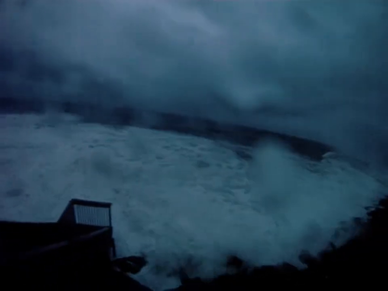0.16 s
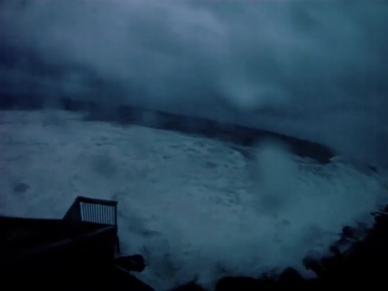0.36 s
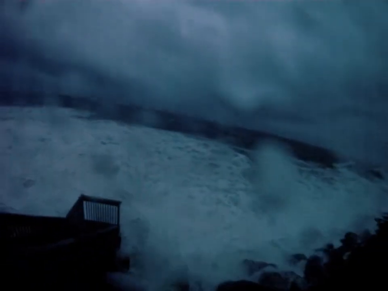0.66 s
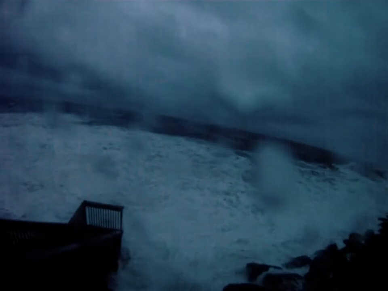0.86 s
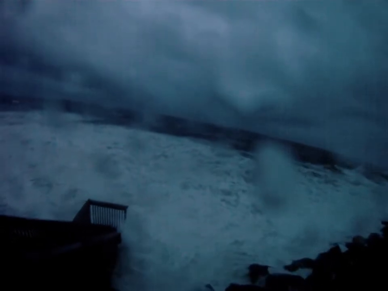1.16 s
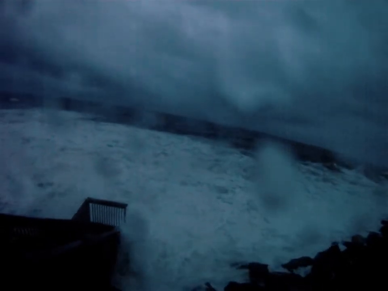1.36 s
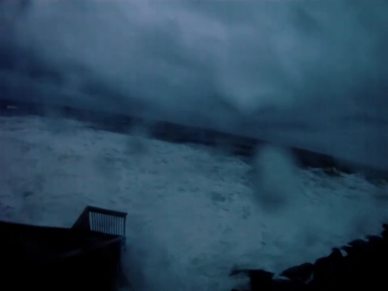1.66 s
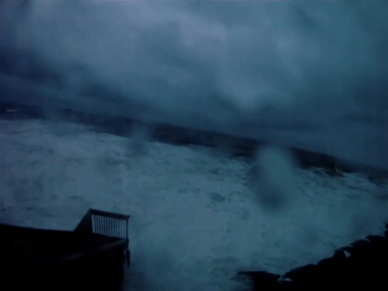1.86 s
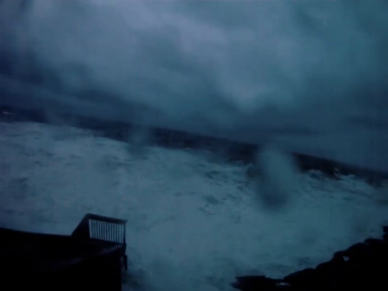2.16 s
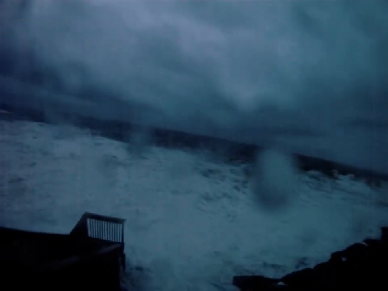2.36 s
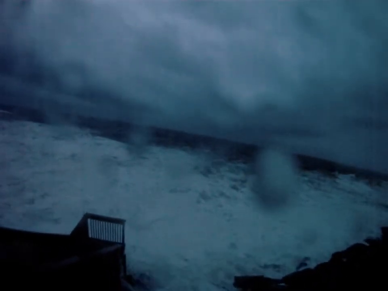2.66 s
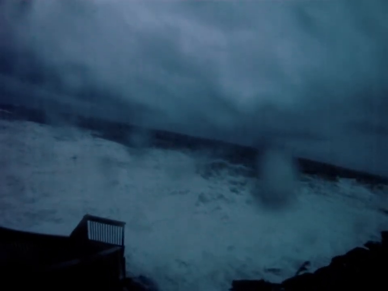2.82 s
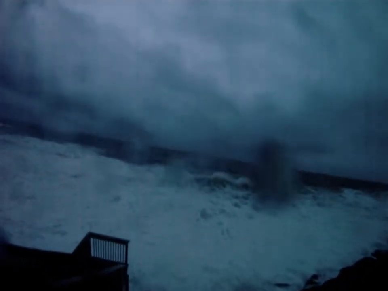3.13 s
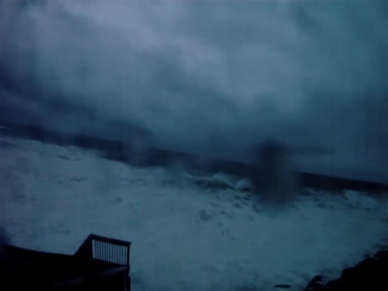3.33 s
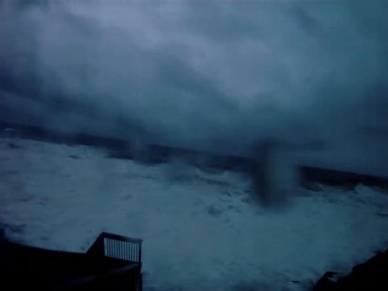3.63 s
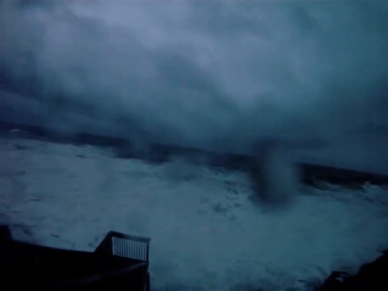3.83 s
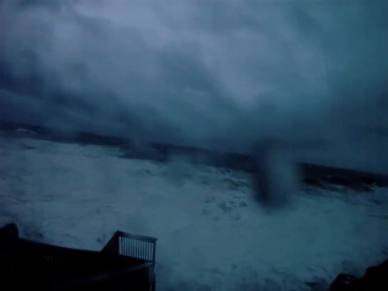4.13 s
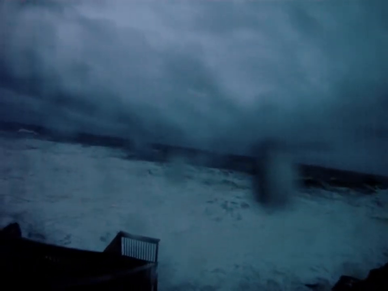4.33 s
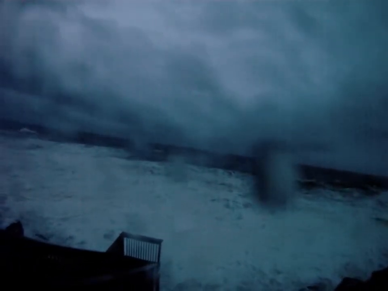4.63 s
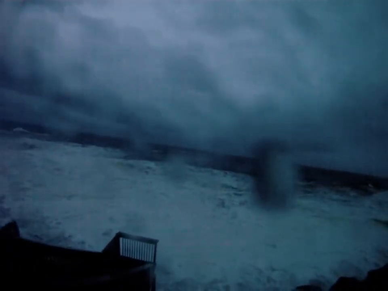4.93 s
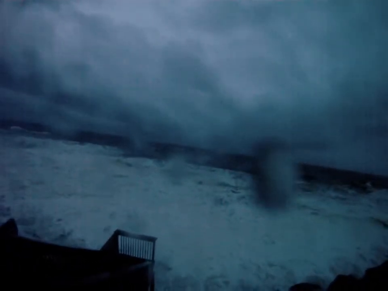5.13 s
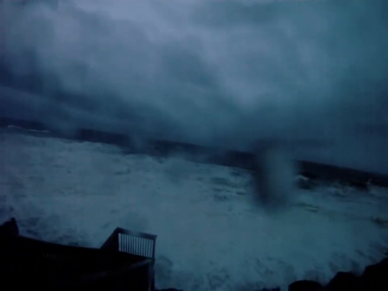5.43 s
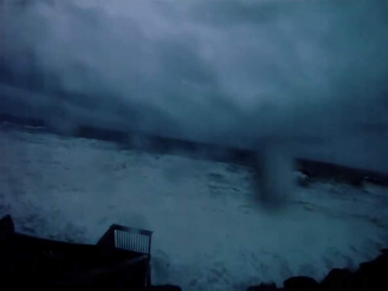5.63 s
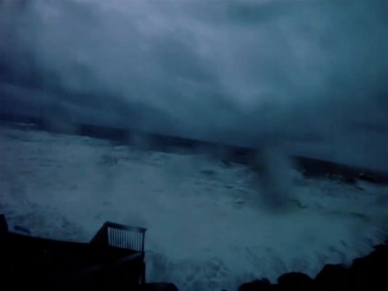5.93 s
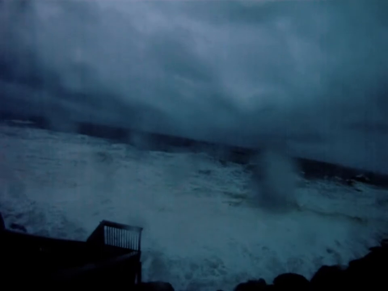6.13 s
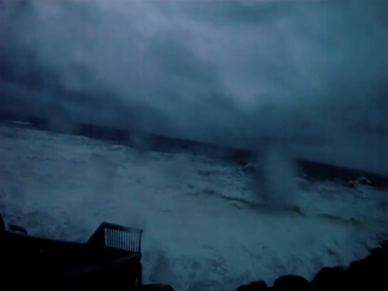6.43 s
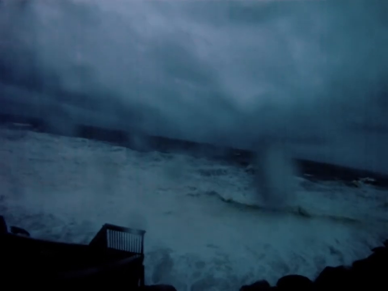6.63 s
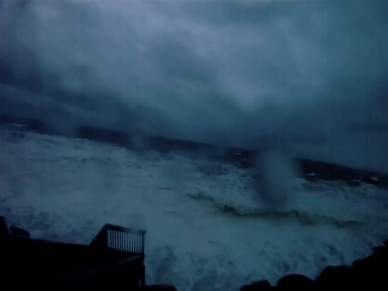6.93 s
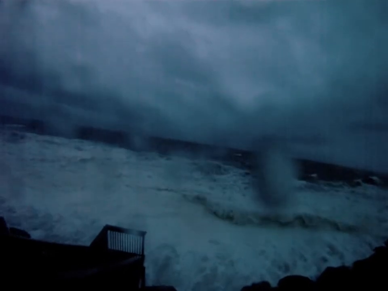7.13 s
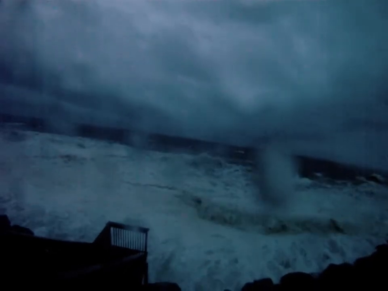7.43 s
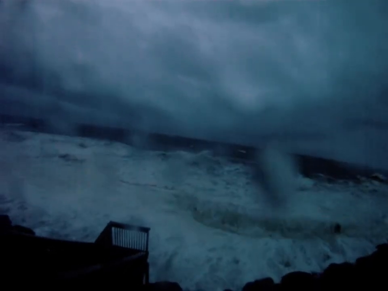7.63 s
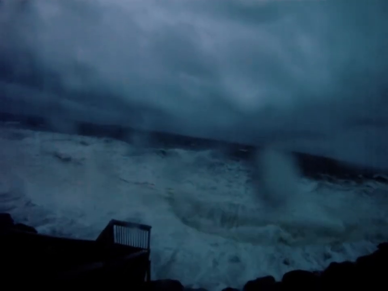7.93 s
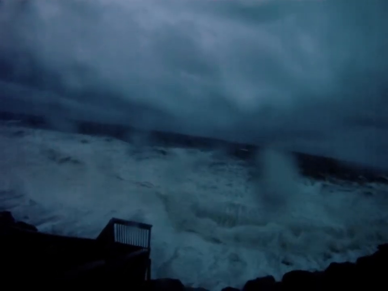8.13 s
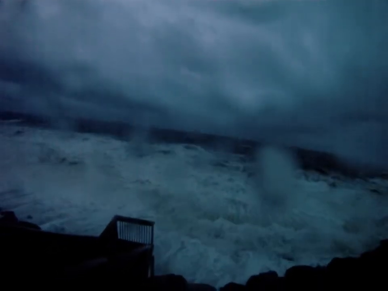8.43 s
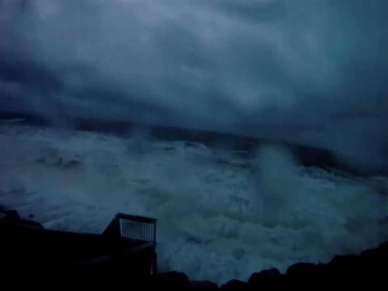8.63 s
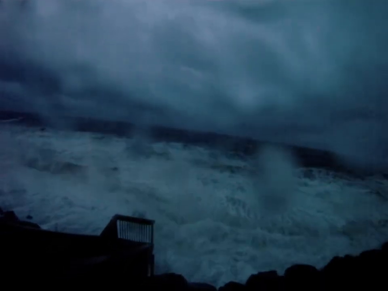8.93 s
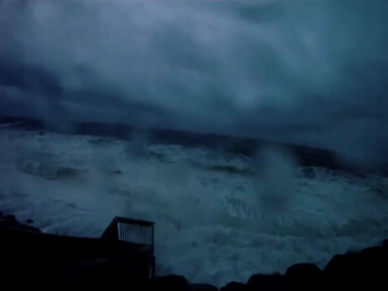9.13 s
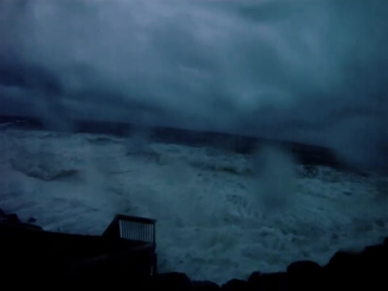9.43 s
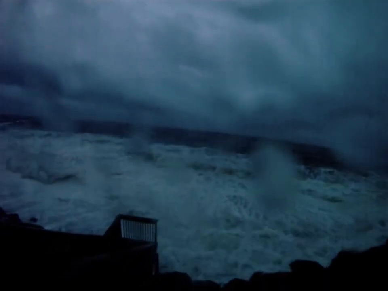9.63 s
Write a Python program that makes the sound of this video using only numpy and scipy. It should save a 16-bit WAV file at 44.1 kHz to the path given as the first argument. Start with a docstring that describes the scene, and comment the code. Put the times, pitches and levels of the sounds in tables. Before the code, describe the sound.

Heavy surf makes a constant rough wash with no cleanly separate wave crashes, over a deep fluttering wind rumble. Very close water drops click, snap and thud on the microphone housing at uneven intervals, sometimes clustered. Hiss is coloured by the case, briefly brighter around six seconds. Late gusts and surf grow fuller. Centred mono, boxy, with muted extreme treble and no echo.

```python
"""A seawall in storm surf, heard from inside a waterproof case.
Wind rumble and surf roar are shaped noise; foam hiss and fine droplets ring through the case's resonances.
Large and small drops tick on the shell: each is a tuned blow, a treble snap, a dull thud and a spatter.
For about a second the resonances sit higher, as if wet. The hardest peaks overload the microphone.
Shared swells, gusts and eddies move the wind, surf and spray levels together."""
import sys
import numpy as np
from scipy import signal
from scipy.fft import rfft, irfft
from scipy.io import wavfile
from scipy.ndimage import map_coordinates

SR = 44100
rng = np.random.default_rng(int(sys.argv[2]) if len(sys.argv) > 2 else 0)


def unload_audio(sound):
    """Save the sound as a 16-bit wav file, at the path given as the first command line argument."""
    columns = np.transpose(np.atleast_2d(sound))
    # keep every value between -1 and 1, then stretch to whole-number steps
    steps = np.round(np.clip(columns, -1, 1) * 32767)
    wavfile.write(sys.argv[1], SR, steps.astype(np.int16))


N = 430857
TIME = np.arange(N) / SR  # [s]

# slow swell of the storm, before the layer trims: (time [s], wind level [dB], surf and spray level [dB])
STORM_SWELL = [(0.0, -37, -40), (0.45, -42.5, -45), (1.0, -41, -45.5), (1.5, -38, -42.5),
               (2.05, -42.5, -46.5), (2.65, -43.5, -46), (3.05, -39.5, -42.5), (3.5, -42.5, -45.0),
               (4.4, -43.5, -46.5), (4.8, -41.0, -44.5), (5.25, -46, -49.5), (5.95, -38.5, -42.0),
               (6.5, -41, -43.0), (7.1, -41, -45.0), (7.7, -42.0, -44.0), (8.6, -38.5, -41),
               (9.15, -40.0, -38), (9.77, -36, -40.0)]
# brief gusts (+) and lulls (-): (mid time [s], length [s], wind change [dB], surf and spray change [dB])
GUSTS_AND_LULLS = [(0.224, 0.058, 5, 4), (0.74, 0.15, 4, 4), (1.118, 0.037, 7.5, 4.5),
                   (1.764, 0.16, -6.5, -4), (1.91, 0.059, 3, 2.5), (2.21, 0.086, -4.5, -7),
                   (2.275, 0.14, 5, 4), (6.018, 0.066, 5.5, 6), (7.696, 0.058, 9, 4.5),
                   (8.206, .08, 5, 3.5), (8.433, 0.27, -3, -2.5), (8.79, 0.19, -3.5, -5),
                   (8.88, 0.13, 7, 6)]
# spectrum of wind on the case: (frequency [Hz], relative level [dB])
WIND_SPECTRUM = [(8, -14), (22, -2), (40, 0), (65, 0), (92, 0.5), (140, -5), (200, -9.5), (300, -15),
                 (500, -24.5), (1000, -58)]
# spectrum of the breaking surf: (frequency [Hz], relative level [dB])
SURF_SPECTRUM = [(100, -16), (250, -0.5), (400, -0.5), (600, -2), (800, -4), (1100, -13), (1800, -4.5),
                 (4000, -55)]
# resonances of the case: (centre [Hz], full width at half gain [Hz], relative level [dB])
CASE_RESONANCES = [(1226, 573, 8), (2200, 840, 9), (2704, 590, 3.5), (3644, 570, 6.5), (4650, 1050, -4),
                   (6100, 9500, -4.5), (8345, 190, 1.5), (9690, 590, -2.5), (10840, 80, -13)]
# water at the microphone port raises the resonances: (time [s], factor on their pitch [1])
WET_PORT_PITCH = [(0, .998), (5.62, .999), (5.9, 1.029), (6.8, 1.031), (7.1, .997), (9.77, .996)]
# large drops on the case, before the layer trim:
# (time [s], level over 10 ms [dB], pitch of the blow [Hz], its sharpness Q [1], relative thud level [dB])
LARGE_DROPS = [(0.0704, -26.5, 5330, 0.88, -33.5), (0.2751, -15, 2340, 1.23, -14.5),
               (0.6692, -34.5, 2430, 2.5, -9), (0.7388, -17.5, 5400, 1, -35), (0.887, -34, 5060, 0.38, -29),
               (0.9742, -33.5, 1130, 2.1, -20), (1.035, -33.5, 1730, 1.4, -31),
               (1.4503, -27, 1800, 1.7, -2), (1.637, -36, 5400, .25, -19), (1.8137, -27.5, 4930, 0.54, -9),
               (1.928, -14, 3020, 2.6, -12), (2.0014, -31.5, 4880, 0.54, -30),
               (2.2441, -30.5, 2170, 0.85, -19), (3.081, -28.5, 4310, 0.24, -8),
               (3.162, -33, 1900, 0.32, -23), (3.2137, -17, 3770, 0.95, -34),
               (3.6431, -19, 5670, 2.2, -20.5), (3.8098, -28, 2740, 0.86, -22),
               (3.8932, -25, 4100, .4, -33), (4.0151, -35.5, 2800, 0.58, -5), (4.1413, -27, 5000, .5, -34),
               (4.158, -33.5, 1600, 1.2, -5), (4.2878, -30, 4520, 0.19, -23), (4.352, -38.5, 4000, .4, -20),
               (4.5684, -16.5, 2560, 1, -22), (4.5961, -17.5, 1200, 1.7, -2.5),
               (4.597, -13, 2300, 3.3, -4.5), (5.0463, -29, 2160, 1.6, -11), (5.2653, -24, 5400, 0.91, -40),
               (5.5653, -24.2, 3850, 0.34, -34), (5.7286, -29, 2200, 0.63, -20),
               (5.732, -29, 4660, 0.89, -30), (5.959, -22, 2180, 2.2, -15.5),
               (6.3162, -29.5, 4520, 0.43, -20), (6.4651, -22.5, 5040, 0.41, -22),
               (6.5285, -36, 5360, 1.4, -22), (6.6424, -29, 5340, 0.37, -22), (7.0182, -24, 5100, 1, -44),
               (7.0892, -23.5, 2080, 0.53, -27), (7.3386, -28, 1480, 1.1, -29),
               (7.648, -31.5, 4070, 0.56, -24), (7.6871, -33, 5800, 2.3, -25),
               (7.8752, -12.5, 3800, 0.47, -6.5), (7.8769, -14.5, 3960, 0.94, -22),
               (8.1989, -14, 2650, 0.59, -17), (8.234, -28, 2280, 0.43, -9), (8.291, -30, 1860, .8, -23),
               (8.664, -20.5, 1870, 0.74, -16), (8.777, -38, 800, 1.4, -5), (8.864, -27.5, 4850, 0.28, -13),
               (8.9762, -28.5, 2250, 1.3, -26), (9.015, -31, 4670, 0.46, -30),
               (9.1767, -22, 2050, 2.8, -28), (9.4883, -20.5, 1540, 1.24, -10)]
# treble snap, strongest at middling pitch: (pitch of the blow [Hz], relative snap level [dB])
SNAP_BY_PITCH = [(1150, -10), (2200, -1.5), (3800, 0.5), (4900, -21), (5600, -35)]

# antiresonance of the case; the width is from its centre to 1/e of its depth
NOTCH_HZ, NOTCH_WIDTH_HZ, NOTCH_DEPTH = 6028, 480, 0.97
# scattered small drops per second, then the pitch and level ranges of all small drops
SMALL_PER_S, SMALL_PITCH_HZ, SMALL_DB = 3.0, (1610, 5500), (-47.5, -35)
# chance that a large drop has a small forerunner, and its lead
FORERUNNER_SHARE, FORERUNNER_S = 0.3, 0.02
BAND_LIMIT_HZ = 11000


def gain_of(db):
    """Turns decibels into amplitude."""
    return 10 ** (np.asarray(db) / 20)


def evened(x):
    """Scales a signal to an rms of 1."""
    return x / np.sqrt(np.mean(x ** 2) + 1e-20)


def curve(rows, s, axis=1):
    """Reads one column of a table at the positions s along its first column."""
    columns = np.transpose(rows)
    return np.interp(s, columns[0], columns[axis])


def filtered_noise(gain):
    """White noise under a spectral gain, at an rms of 1."""
    white = rng.standard_normal(N)
    return evened(irfft(rfft(white) * gain, N))


def coloured(spectrum):
    """Noise with a tabled spectrum, joined up along log frequency."""
    hz, db = np.transpose(spectrum)
    log_hz = np.log(np.fft.rfftfreq(N, 1 / SR) + 1)
    return filtered_noise(gain_of(np.interp(log_hz, np.log(hz), db)))


def wander(top_hz):
    """Smooth random motion of rms 1, fading below about 4 Hz and above top_hz."""
    hz = np.fft.rfftfreq(N, 1 / SR)
    return filtered_noise(hz / (hz + 4) / (1 + (hz / top_hz) ** 2))


def gusts(axis):
    """Air comes in bursts: each gust or lull is a smooth bell in dB, read from one column."""
    return sum(row[axis] * np.exp(-(2 * (TIME - row[0]) / row[1]) ** 2) for row in GUSTS_AND_LULLS)


def wind(eddies_db, level_db=0.25, buffet_db=1.68):
    """Eddies buffet the case into a low rumble."""
    swell_db = curve(STORM_SWELL, TIME, axis=1) + gusts(axis=2) + eddies_db
    buffeting_db = buffet_db * wander(top_hz=23)
    return coloured(WIND_SPECTRUM) * gain_of(swell_db + level_db + buffeting_db)


def surf(surge_db, level_db=-11.0, churn_db=2.0):
    """Broken water gives a dull, churning roar."""
    churning_db = churn_db * wander(top_hz=7.6)
    return coloured(SURF_SPECTRUM) * gain_of(surge_db + level_db + churning_db)


def bins(size=4096):
    """Frequencies [Hz] on which responses are drawn."""
    return np.fft.rfftfreq(size, 1 / SR)


def housing(hz):
    """Gain of the hollow case: its resonances add in power and one antiresonance cuts deep."""
    power = 0
    for centre_hz, width_hz, db in CASE_RESONANCES:
        power = power + gain_of(db) ** 2 / (1 + (2 * (hz - centre_hz) / width_hz) ** 2) ** 2
    notch = 1 - NOTCH_DEPTH * np.exp(-((hz - NOTCH_HZ) / NOTCH_WIDTH_HZ) ** 2)
    return np.sqrt(power) * notch


def causal(gain, size=1024):
    """Minimum-phase response with this shape of gain: it starts at once and then rings out."""
    both_sides = np.r_[gain, gain[-2:0:-1]]
    log_gain = np.log(np.maximum(both_sides / gain.max(), 1e-5))
    spectrum = np.exp(np.conj(signal.hilbert(log_gain)))
    return np.fft.ifft(spectrum).real[:size]


def patter(median_per_s=110, spread_db=2.0, bunching=0.8):
    """Fine droplets strike in flurries, dull to bright; most are small and a few stand out."""
    # the droplet rate applies to each band
    chance = median_per_s / SR * np.exp(bunching * wander(top_hz=23.2))
    out = np.zeros(N)
    for band_hz in [(500, 2000), (1700, 3600), (3000, 11000), (900, 11000)]:
        size_db = spread_db * np.minimum(rng.exponential(1, N), 4)
        sizes = gain_of(size_db) * rng.choice([-1, 1], N)
        strikes = sizes * (rng.random(N) < chance)
        colour = signal.butter(2, band_hz, "bandpass", fs=SR, output="sos")
        out += signal.sosfilt(colour, strikes + 1e-12)
    return evened(out)


def spray(surge_db, hiss_db=-0.96, patter_db=-8.5):
    """Foam hiss and blown droplets excite the resonances of the case."""
    drive = gain_of(hiss_db) * rng.standard_normal(N) + gain_of(patter_db) * patter()
    ring = causal(housing(bins()))
    inside = signal.oaconvolve(drive, ring / np.linalg.norm(ring))[:N]
    # running faster through the sound lifts all its resonances together
    position = np.cumsum(curve(WET_PORT_PITCH, TIME))
    inside = map_coordinates(inside, [position], order=3, mode="mirror")
    return inside * gain_of(surge_db)


def drop(s, level_db, pitch_hz, q, thud_db, thud_hz=720, thud_q=0.73, splash=0.22, size=1024):
    """One drop: a tuned blow and a snap ring the case over a dull thud; a brief spatter follows."""
    hz = bins() + 1
    blow = 1 / (1 + (q * (hz / pitch_hz - pitch_hz / hz)) ** 2)
    purity_cut = np.hypot(1, q / 1.5)  # a purer blow snaps less
    snap = gain_of(curve(SNAP_BY_PITCH, pitch_hz)) * (hz / 9000) ** 2 / purity_cut
    thud = gain_of(thud_db) / (1 + (thud_q * (hz / thud_hz - thud_hz / hz)) ** 2) ** 0.82
    softness = 1 / np.sqrt(1 + (hz / 10100) ** 40)  # water is too soft to drive the very top
    shell = housing(hz / curve(WET_PORT_PITCH, s)) * np.hypot(blow, snap)
    ring = causal(np.hypot(shell, thud) * softness)
    spatter_s = 0.0013  # decay time
    force = splash * rng.standard_normal(size) * np.exp(-np.arange(size) / SR / spatter_s)
    force[0] = 1  # the impact itself
    tick = signal.fftconvolve(force, ring)[:size]
    unit_level = np.sqrt(SR / 100 / np.sum(tick ** 2))  # rms of 1 if its energy fills 10 ms
    return gain_of(level_db) * tick * unit_level


def add(mix, s, sound):
    """Lays a sound into the mix at time s."""
    part = mix[max(round(s * SR), 0):][:len(sound)]
    part += sound[:len(part)]


def drops(level_db=0.07):
    """Large drops strike the shell at their tabled times."""
    out = np.zeros(N)
    for row in LARGE_DROPS:
        add(out, row[0], drop(*row))
    return gain_of(level_db) * out


def small_drops(q=1.0, thud_db=-18):
    """Lighter drops strike the shell, some just ahead of a large one, the rest scattered."""
    led = rng.random(len(LARGE_DROPS)) < FORERUNNER_SHARE
    ahead = np.transpose(LARGE_DROPS)[0][led] - FORERUNNER_S
    # one scattered drop at a random moment in each equal slot of time
    slots = np.arange(int(SMALL_PER_S * N / SR))
    scattered = (slots + rng.random(len(slots))) / SMALL_PER_S
    times = np.r_[ahead, scattered]
    out = np.zeros(N)
    for s, (size, pitch) in zip(times, rng.random((len(times), 2))):
        level_db = np.interp(size, [0, 1], SMALL_DB)
        pitch_hz = np.exp(np.interp(pitch, [0, 1], np.log(SMALL_PITCH_HZ)))
        add(out, s, drop(s, level_db, pitch_hz, q, thud_db))
    return out


def scene(eddy_db=0.97, flurry_db=0.89):
    """Wind, surf and spray share eddies, drops land on top; one microphone feeds both channels."""
    eddies_db = eddy_db * wander(top_hz=15.5)
    flurries_db = flurry_db * wander(top_hz=21.3)
    surge_db = curve(STORM_SWELL, TIME, axis=2) + gusts(axis=3) + eddies_db + flurries_db
    mix = wind(eddies_db) + surf(surge_db) + spray(surge_db) + drops() + small_drops()
    return np.tile(mix, (2, 1))


def record(dry):
    """The microphone overloads flat at its limit, then a steep low-pass closes off the treble."""
    clipped = np.clip(dry, -0.9, 0.9)
    low_pass = signal.firwin(401, BAND_LIMIT_HZ, window=("kaiser", 8), fs=SR)
    return signal.oaconvolve(clipped, low_pass[None], "same")


dry = scene()
out = record(dry)
unload_audio(out)
```